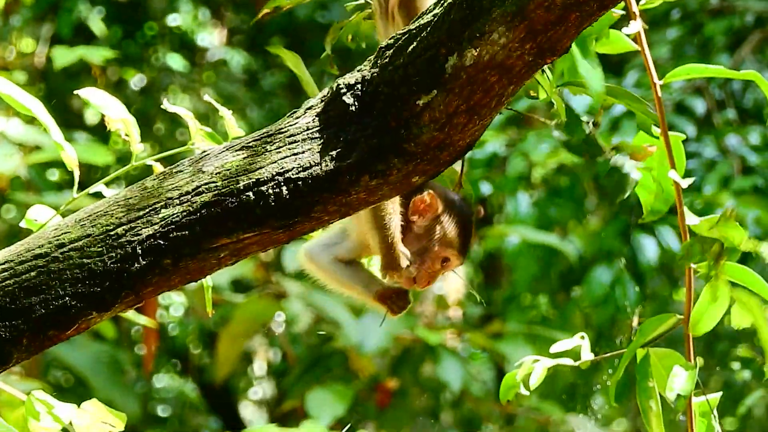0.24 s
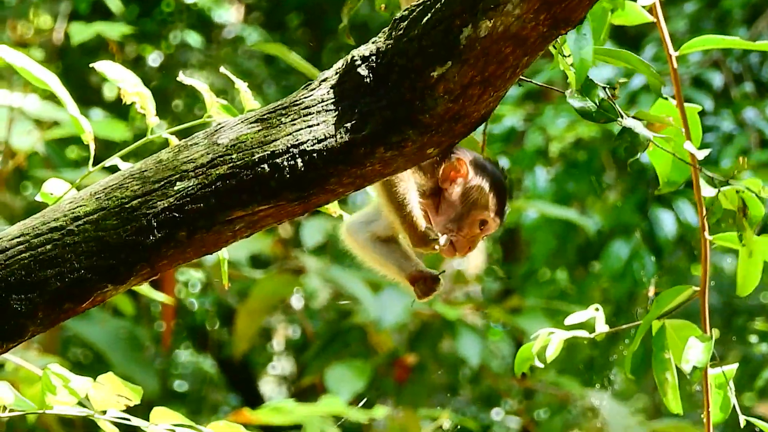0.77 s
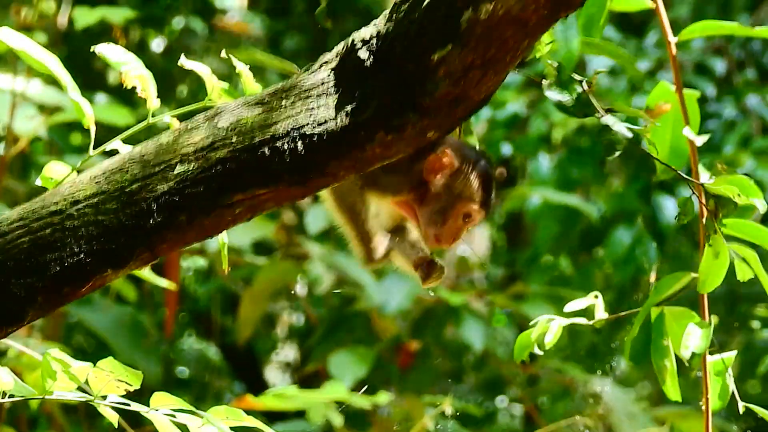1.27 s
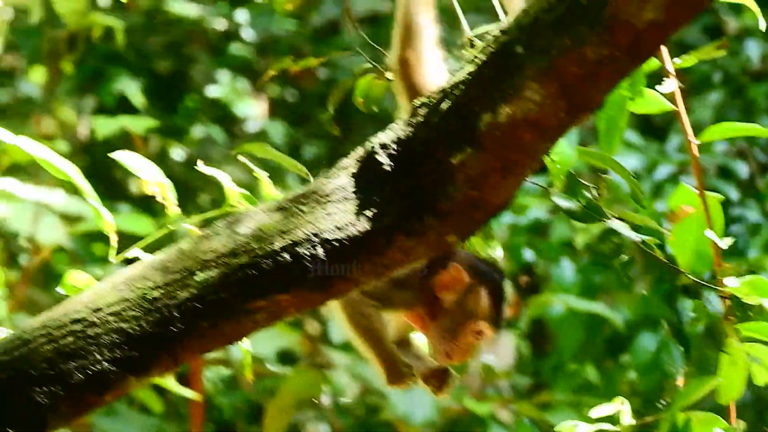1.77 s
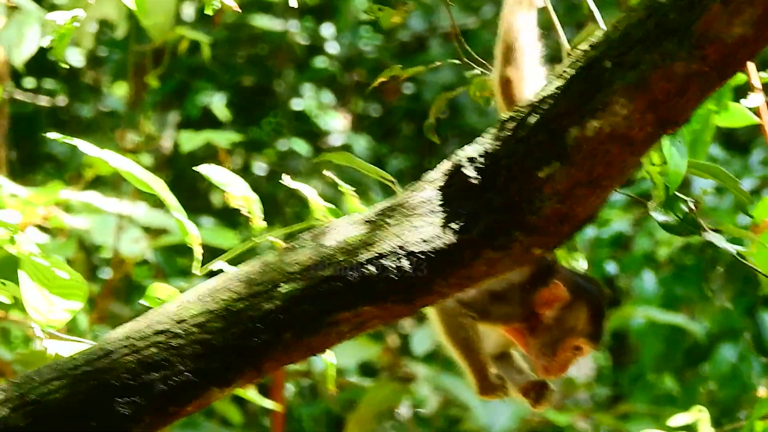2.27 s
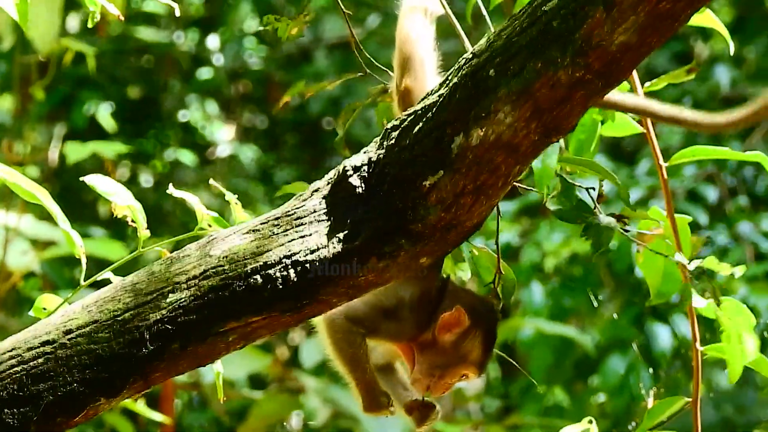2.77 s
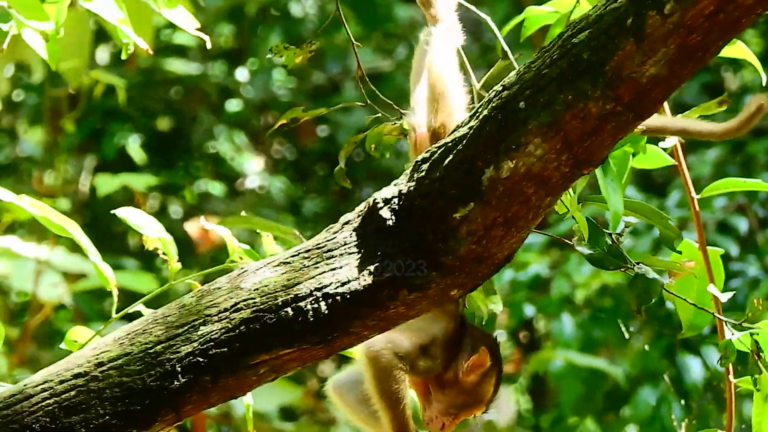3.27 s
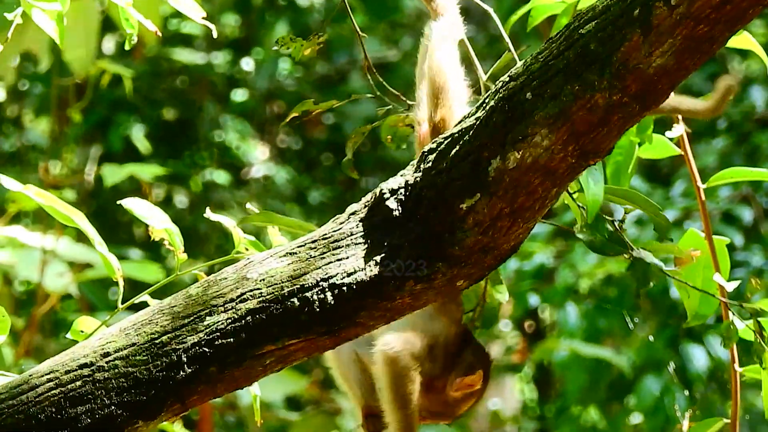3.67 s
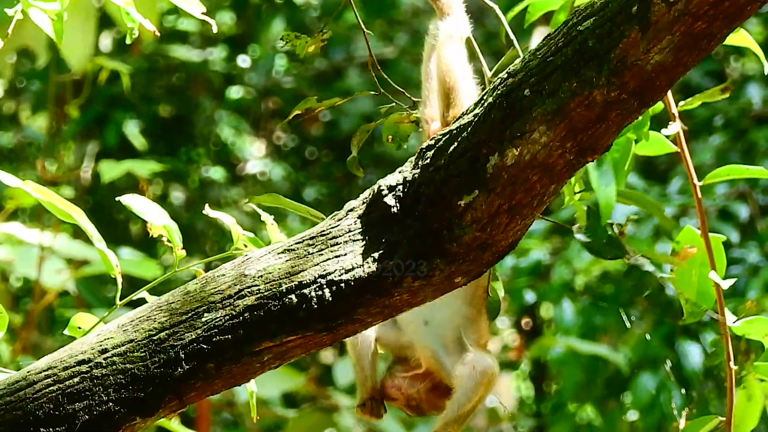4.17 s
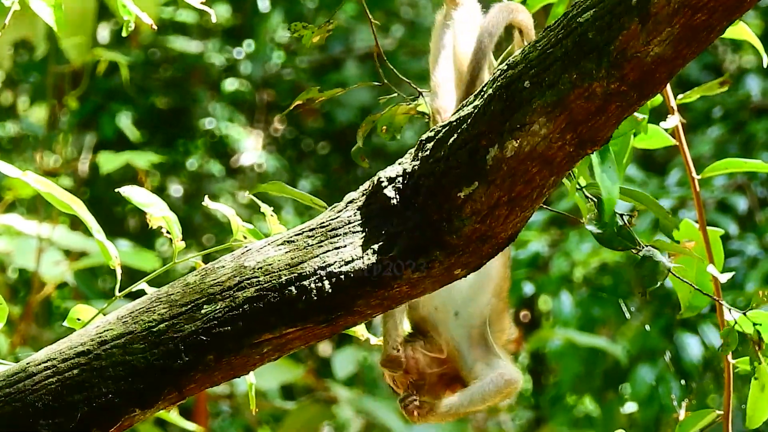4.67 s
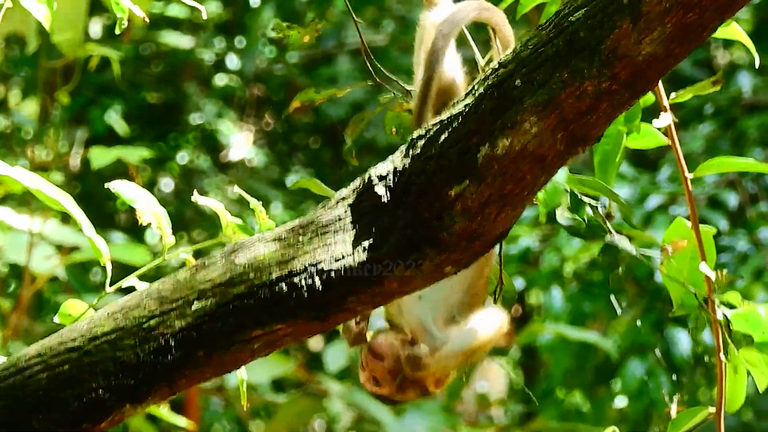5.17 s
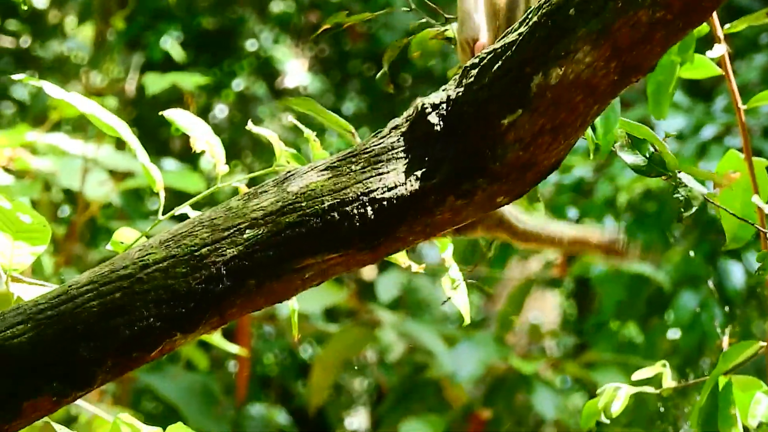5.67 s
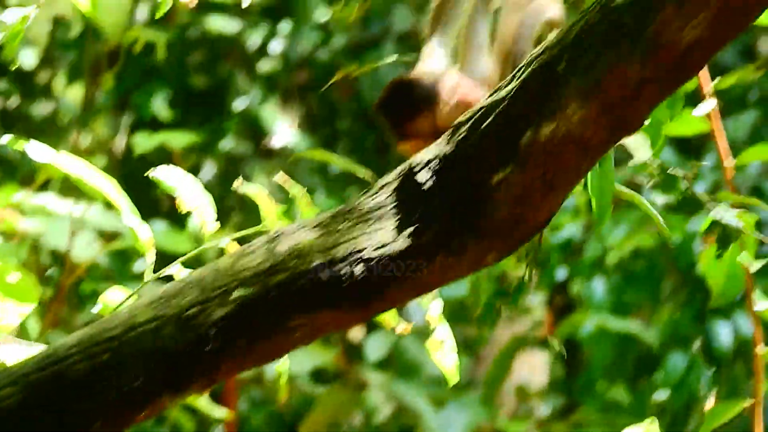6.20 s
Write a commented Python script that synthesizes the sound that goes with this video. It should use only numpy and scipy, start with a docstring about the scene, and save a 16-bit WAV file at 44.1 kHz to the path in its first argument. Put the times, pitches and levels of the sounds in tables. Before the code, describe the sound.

At a forest edge, deep distant traffic rumbles continuously beneath a high insect hiss. One insect rasps evenly about five times a second. Thin, very high bird chirps appear early, then in a quick falling run, with a sharp closer squeak around three seconds and faint gliding whistles farther away. Occasional twigs tick. A wide stereo microphone catches calls scattering among trees.

```python
"""A forest edge with far road traffic rumbling behind it. One insect rasps five times a second, in
flares of filtered noise, over a steady noise chorus; small birds chirp and whistle in trilled or gliding
sines, and one sharp squeak, a sine with its octave, comes from nearer by. Trunks and leaves give the bird
calls, squeak and ticks a scattered noise tail; now and then a twig ticks. Traffic is bands of noise and
one wavering engine drone; a faint moan and a soft sizzle come and go."""
import sys
import numpy as np
from scipy import signal
from scipy.fft import rfft, irfft
from scipy.io import wavfile
from scipy.ndimage import uniform_filter1d

SR = 44100
rng = np.random.default_rng(int(sys.argv[2]) if len(sys.argv) > 2 else 0)


def output_pcm(signal):
    """Save a mono or channel-first signal as 16-bit PCM at the path in sys.argv[1].

    Samples are clipped to [-1, 1] before scaling.
    """
    pcm = np.clip(np.atleast_2d(signal).T, -1, 1) * 32767
    wavfile.write(sys.argv[1], SR, np.round(pcm).astype(np.int16))


N = 284004
TIME = np.arange(N) / SR


def gain_of(db):
    """Decibels to gain."""
    return 10 ** (np.asarray(db) / 20)


def evened(x):
    """Scales to rms 1."""
    return x / np.sqrt(np.mean(x ** 2) + 1e-20)


def read(points, hz):
    """Reads a table of values by frequency on a log-frequency axis."""
    f, value = np.transpose(points)
    return np.interp(np.log(hz + 1), np.log(f + 1), value)


def follow(rows, t=TIME):
    """Reads every column of a curve table at the times t."""
    s, *columns = np.transpose(rows)
    return [np.interp(t, s, c) for c in columns]


def add(mix, s, sound):
    """Mixes a sound in at s seconds."""
    part = mix[round(s * SR):][:len(sound)]
    part += sound[:len(part)]


def wander(rate_hz):
    """Smooth random drift of rms 1: noise with a soft roll-off around rate_hz."""
    hz = np.fft.rfftfreq(N, 1 / SR)
    return evened(irfft(rfft(rng.standard_normal(N)) * np.exp(-(hz / rate_hz) ** 2), N))


# Likeness of the two ports. Each row: frequency in Hz, left-right likeness from 0 to 1.
LIKENESS = [(60, .9955), (200, .994), (380, .975), (700, .95), (1300, .91), (2400, .85), (3500, .72),
            (4700, .6), (6800, .25), (15000, .05)]
# Phase between the ports. Each row: frequency in Hz, lead of the left port in radians.
LEFT_LEAD = [(0, 0), (2500, 0), (4650, -.5), (5800, -.4), (6600, -.9), (7500, 0)]


def air_noise(spectrum, patchy_db, size=1024):
    """Diffuse stereo noise that swells in drifting patches; the two ports agree most in the bass."""
    hz = np.fft.rfftfreq(size, 1 / SR)
    draws = rng.standard_normal((5, N * 4 // size + 5, len(hz)))
    a, b, c, d, patches = draws.transpose(0, 2, 1)
    # smooth over frequency, then over time
    patches = uniform_filter1d(patches, size=7, axis=0)
    patches = evened(uniform_filter1d(patches, size=5, axis=1))
    # the right port shares part of the left and gets the rest of its own
    same = np.clip(read(LIKENESS, hz), -1, 1)[:, None]
    left = a + 1j * b
    right = same * left + np.sqrt(1 - same ** 2) * (c + 1j * d)
    right = right * np.exp(-1j * read(LEFT_LEAD, hz))[:, None]
    z = np.array([left, right]) * gain_of(read(spectrum, hz)[:, None] + patchy_db * patches)
    return evened(signal.istft(z, nperseg=size, noverlap=size - size // 4)[1][:, :N])


def slur(length, hz, glide_hz, bend, trill_hz=0):
    """Phase and envelope of a note gliding through hz, bent by an unsteady throat and a fast trill."""
    t = np.arange(int(length * SR)) / SR
    pitch = (hz + glide_hz * (t / length - .5)) * (1 + bend[:len(t)])
    pitch = pitch + trill_hz * np.sin(2 * np.pi * (135 * t + rng.random()))  # trill at 135 Hz
    # sqrt(2) gives the sine under the envelope an rms of 1
    envelope = np.sqrt(2) * evened(signal.windows.tukey(len(t), .45))
    return 2 * np.pi * np.cumsum(pitch) / SR, envelope


FIRST_STROKE_S, STROKES_PER_S, SLOWING_PER_S2 = .087, 5.138, .0213  # the strokes slow slightly
# Colour of the rasp. Each row: frequency in Hz, relative density in dB.
RASP_COLOUR = [(3000, -42), (3900, -21.5), (4200, -4.5), (4500, 2.5), (4720, 7), (4900, 0.5), (5100, -3),
               (5500, -7), (6300, -46), (10000, -65)]


def rasping_insect():
    """One insect's regular strokes: noise flares up and dies away among the leaves."""
    t = TIME - FIRST_STROKE_S
    strokes = 1 + STROKES_PER_S * t - SLOWING_PER_S2 * t ** 2 / 2
    stroke = strokes.astype(int)
    age = strokes % 1 / STROKES_PER_S  # seconds into the stroke
    flare = (1 - np.exp(-(age / 0.012) ** 2)) * np.exp(-age / 0.078)
    force = gain_of(-33.5 + rng.standard_normal(stroke[-1] + 1) / 2)[stroke]
    # a floor at -41 dB keeps the rasp from going silent between strokes
    return np.hypot(force * flare, gain_of(-41)) * air_noise(RASP_COLOUR, patchy_db=1)


RUN_START_S, RUN_STEP_S, RUN_NOTE_S = 2.251, .113, 0.048
RUN_FIRST_HZ, RUN_LAST_HZ, RUN_SETTLE_S, RUN_TRILL_HZ = 6910, 6570, .125, 30  # sinks towards RUN_LAST_HZ
RUN_DB, RUN_ENDS_DB = -27, -5  # level in the middle, and the change from there to either end


def chirp_run(count):
    """Evenly spaced chirps that sink in pitch while they swell and fade."""
    t = np.arange(count) * RUN_STEP_S
    hz = RUN_LAST_HZ + (RUN_FIRST_HZ - RUN_LAST_HZ) * np.exp(-t / RUN_SETTLE_S)
    db = RUN_DB + RUN_ENDS_DB * np.linspace(-1, 1, count) ** 2
    return [(RUN_START_S + s, RUN_NOTE_S, f, level, RUN_TRILL_HZ) for s, f, level in zip(t, hz, db)]


CHIRP_SAG = .012  # fall of each chirp as a share of its pitch
CHIRP_WET = 0.88  # share of the power that the leaves scatter
# Thin chirps. Each row: start in seconds, length in seconds, pitch in Hz, level in dB before the trees,
# trill depth in Hz.
CHIRP_NOTES = [ (1.2, 0.049, 6190, -27.5, 66), (1.31, 0.03, 6290, -24.5, 83),
               (1.329, 0.051, 6290, -19.5, 110), (2.217, 0.038, 6990, -32.5, 30),
               (3.267, 0.033, 5770, -27.5, 6.2), (4.283, .03, 6120, -37, 5), (5.355, .04, 6260, -32.5, 20),
               (5.408, .041, 6560, -28, 310), (5.473, 0.049, 6715, -26.5, 160),
               (5.555, 0.034, 6570, -31, 150), (5.683, 0.038, 5710, -32, 18)]


def chirps():
    """Sagging sines with a fast trill; returns the direct part and the part sent into the trees."""
    out, unsteady = np.zeros(N), 0.0071 * wander(162)
    for s, length, hz, db, trill_hz in CHIRP_NOTES + chirp_run(count=6):
        angle, swell = slur(length, hz, -CHIRP_SAG * hz, unsteady[round(s * SR):], trill_hz)
        add(out, s, gain_of(db) * swell * np.sin(angle))
    return np.sqrt(1 - CHIRP_WET) * out, np.sqrt(CHIRP_WET) * out


# Syllables of the near squeak. Each row: start in seconds, length in seconds, pitch in Hz, glide in Hz,
# fundamental in dB and octave in dB, both before the trees.
SQUEAK_SYLLABLES = [ (2.95, .048, 3540, -180, -63, -36), (2.996, 0.028, 3400, -12, -56, -24.5),
                    (3.029, 0.035, 3983, 30, -29.5, -30), (3.054, 0.034, 4115, 30, -28.5, -37.5),
                    (3.082, 0.031, 3630, -20, -51, -32)]


def squeak():
    """A thin falling squeak, heard as its octave, that jumps up in pitch and sounds full for a moment."""
    out, unsteady = np.zeros(N), 0.007 * wander(277)
    for s, length, hz, glide_hz, first_db, octave_db in SQUEAK_SYLLABLES:
        angle, swell = slur(length, hz, glide_hz, unsteady[round(s * SR):])
        fundamental = gain_of(first_db) * np.sin(angle)
        octave = gain_of(octave_db) * np.sin(2 * angle)
        add(out, s, swell * (fundamental + octave))
    return out


# Slurred notes of a farther bird. Each row: start in seconds, length in seconds, pitch in Hz, glide in Hz,
# level in dB before the trees, rms quaver as a share of pitch.
WHISTLE_NOTES = [ (1.595, 0.13, 3217, 130, -40, 0.012), (1.797, .02, 3565, -150, -39, .02),
                 (1.81, 0.046, 3240, -15, -35.5, 0.0087), (1.95, 0.037, 3314, -13, -37.5, 0.0066),
                 (2.44, 0.075, 2987, 160, -36.5, .015), (2.65, .07, 3180, 120, -38, .02),
                 (2.73, 0.12, 2813, -600, -38.5, .026), (5.74, 0.0848, 3364, 340, -36, .016),
                 (5.915, .125, 3290, -260, -41, .02), (6.06, 0.052, 2884, -300, -36, 0.032),
                 (6.15, 0.036, 2590, -50, -43, .02)]


def whistles():
    """A farther bird whistles slurred notes: gliding sines with a slight random quaver."""
    out, unsteady = np.zeros(N), wander(112)
    for s, length, hz, glide_hz, db, quaver in WHISTLE_NOTES:
        angle, swell = slur(length, hz, glide_hz, quaver * unsteady[round(s * SR):])
        add(out, s, gain_of(db) * swell * np.sin(angle))
    return out


# Twig ticks. Each row: start in seconds, onset level in dB before the trees, centre in Hz.
TWIG_TICKS = [(1.803, -38, 4500), (2.088, -38, 6800), (3.113, -31, 6300), (6.21, -39, 5000)]


def twigs():
    """Dry ticks: short, fast-dying bursts of noise in one broad resonance."""
    out, t = np.zeros(N), np.arange(SR // 20) / SR
    for s, db, hz in TWIG_TICKS:
        wood = signal.lfilter(*signal.iirpeak(hz, 3.5, fs=SR), rng.standard_normal(len(t)))
        wood = signal.sosfilt(signal.butter(4, 8000, fs=SR, output="sos"), wood)
        add(out, s, gain_of(db) * evened(wood) * np.exp(-t / 0.019))
    return out


# Ring of the trees. Each row: frequency in Hz, time to fall by 60 dB in seconds.
FOREST_DECAY = [(2500, 1.1), (4000, 1.74), (6300, 1.38), (8000, 1.14), (12000, 0.82)]


def forest(direct, scattered, lag, pan_db, one_side, all_round):
    """Trunks and leaves add a dense noise tail, part from the caller's side; left leads by lag samples."""
    hz, t, z = signal.stft(rng.standard_normal((3, SR)), SR, nperseg=256)
    near_leaves = 1 + 0.45 * np.exp(-t / 0.014)  # stronger early scatter
    decay = gain_of(-60 * t / read(FOREST_DECAY, hz)[:, None])
    tail = signal.istft(z * near_leaves * decay, SR, nperseg=256)[1]
    echoes = signal.fftconvolve(scattered[None], tail / np.linalg.norm(tail[0]), axes=1)[:, :N]
    sides = np.array([[1], [-1]]) / 2  # left, right
    steering = gain_of(sides * pan_db) * np.exp(2j * np.pi * np.fft.rfftfreq(N) * sides * lag)
    steered = irfft(rfft(direct + one_side * echoes[0]) * steering, N)
    return steered + all_round * echoes[1:]


# Level of the insect chorus. Each row: time in seconds, level in dB.
CHORUS_LEVEL = [(0, -36), (.5, -42.5), (3.6, -38.5), (5.2, -39.5), (6.44, -37.5)]
# Colour of the chorus. Each row: frequency in Hz, relative density in dB.
CHORUS_COLOUR = [(2500, -34), (3800, -12.5), (4400, 0), (5200, -0.5), (5700, -0.5), (6300, 1.5), (6800, -1),
                 (7400, -7), (8000, -13.5), (9000, -21), (10000, -27.5), (12000, -42), (15500, -70)]


def insect_chorus():
    """Many insects blur into a hiss of noise with a slight flutter in level."""
    level_db = follow(CHORUS_LEVEL)[0] + 0.44 * wander(25)
    return gain_of(level_db) * air_noise(CHORUS_COLOUR, patchy_db=1.6)


# Level of the sizzle. Each row: time in seconds, level in dB.
SIZZLE_LEVEL = [(0, -50), (1.2, -63), (4.4, -52), (4.8, -47), (6.44, -47.5)]
# Colour of the sizzle. Each row: frequency in Hz, relative density in dB.
SIZZLE_COLOUR = [(1000, -70), (2000, -32), (2600, -6), (3100, 0.5), (3700, 2), (4100, 3.5), (5000, -33),
                 (9000, -70)]


def sizzle():
    """A soft distant sizzle of band noise that sinks at first and swells later on."""
    return gain_of(follow(SIZZLE_LEVEL)[0]) * air_noise(SIZZLE_COLOUR, patchy_db=2.5)


# Levels of the road. Each row: time in seconds, deep rumble in dB, boom in dB, tyre noise in dB.
ROAD_LEVELS = [(0, -28, -31, -40), (1.3, -30.5, -31.5, -39.3), (2.2, -30.5, -29.5, -40),
               (3.4, -31.5, -28.7, -39.5), (4.8, -31, -28.5, -38.5), (5.5, -31, -29, -38.5),
               (6.44, -31, -27, -37.5)]
# Colours of rumble, boom, tyres and a nearing vehicle. Each row: frequency in Hz, relative density in dB.
RUMBLE_COLOUR = [(15, -55), (25, -36), (32, -29), (42, -15.5), (60, -4.5), (80, -1), (100, 1.5), (125, -7),
                 (200, -22.5), (500, -66)]
BOOM_COLOUR = [(40, -46), (80, -15.5), (105, -1), (140, 1), (170, -4), (195, -7), (230, -11.5),
               (265, -15.5), (320, -20), (380, -32), (900, -64)]
TYRE_COLOUR = [(120, -32), (250, 0.5), (360, 0.5), (440, 1.5), (490, -2.5), (610, 0.5), (730, -2),
               (880, -4), (1050, -5), (1850, -6.5), (2150, -2.5), (2500, -9), (3600, -12.5), (7000, -22.5),
               (11000, -35), (15000, -48)]
NEARING_COLOUR = [(150, -22), (205, 0), (265, -0.5), (340, -7.5), (450, -13), (700, -40), (2000, -100)]
NEARING_END_DB, NEARING_DB_PER_S = -42.5, 5


def traffic():
    """Far traffic as bands of noise: deep rumble, boom, tyres, and a nearing vehicle that grows louder."""
    rumble_db, boom_db, tyres_db = follow(ROAD_LEVELS)
    rumble = gain_of(rumble_db) * air_noise(RUMBLE_COLOUR, patchy_db=.6, size=8192)
    boom = gain_of(boom_db) * air_noise(BOOM_COLOUR, patchy_db=1.37, size=4096)
    tyres = gain_of(tyres_db) * air_noise(TYRE_COLOUR, patchy_db=3.0, size=4096)
    nearing_db = NEARING_END_DB - NEARING_DB_PER_S * (TIME[-1] - TIME)
    nearing = gain_of(nearing_db) * air_noise(NEARING_COLOUR, patchy_db=1.5, size=4096)
    return rumble + boom + tyres + nearing


# One far engine, before its wavering. Each row: time in seconds, pitch in Hz, fundamental in dB, octave in dB.
ENGINE_CURVE = [(0, 173, -52, -55.5), (1.2, 174, -41, -54), (3.2, 160, -32.5, -60), (5.4, 155, -33.5, -50),
                (5.9, 165, -34.5, -45.5), (6.44, 163.4, -39, -45)]


def engine_drone():
    """One far engine: a sine and its octave, both wavering in pitch and level."""
    hz, first_db, octave_db = follow(ENGINE_CURVE)
    angle = 2 * np.pi * np.cumsum(hz * (1 + 0.00968 * wander(7))) / SR
    fundamental = gain_of(first_db) * np.sin(angle)
    octave = gain_of(octave_db) * np.sin(2 * angle)
    return np.sqrt(2) * (fundamental + octave) * gain_of(2 * wander(11))


MOAN_SWELL_S, MOAN_REST_DB = 0.21, -50.5  # width of a swell, and the floor between swells
# Swells of the moan. Each row: peak time in seconds, level in dB, added in power to the floor.
MOAN_SWELLS = [(.08, -44.5), (1.25, -48), (3.7, -48.5), (4.8, -46), (6.3, -49.5)]
# Colour of the moan. Each row: frequency in Hz, relative density in dB.
MOAN_COLOUR = [(600, -50), (735, -13), (765, 1), (795, 2), (840, -1), (880, -7), (1100, -69)]


def moan():
    """A faint far moan: narrow-band noise that comes and goes in smooth swells."""
    swells = sum(gain_of(db) * np.exp(-((TIME - s) / MOAN_SWELL_S) ** 2) for s, db in MOAN_SWELLS)
    level = np.hypot(swells, gain_of(MOAN_REST_DB))
    return level * air_noise(MOAN_COLOUR, patchy_db=5.0, size=4096)


def scene():
    """Birds lean right; squeak and twigs reach the left first; insects and traffic lie all round."""
    song, near = whistles(), squeak() + twigs()
    chirping = forest(*chirps(), lag=-2.05, pan_db=-2.5, one_side=0.57, all_round=0.61)
    # the farther bird is heard mostly through its scattered tail
    whistling = forest(song / 10, song, lag=0.074, pan_db=-2.5, one_side=0.72, all_round=0.44)
    squeaking = forest(0.78 * near, 0.93 * near, lag=1.68, pan_db=-0.5, one_side=0.67, all_round=.45)
    calls = chirping + whistling + squeaking
    insects = rasping_insect() + insect_chorus() + sizzle()
    return calls + insects + traffic() + engine_drone() + moan()


EDGE_HZ = 15700  # upper band limit


def record(dry):
    """The right port is a little more sensitive; then the band limit."""
    ports = dry * gain_of([[-.28], [.28]])
    lowpass = signal.firwin(511, EDGE_HZ, window=("kaiser", 9), fs=SR)
    return signal.oaconvolve(ports, lowpass[None], "same")


dry = scene()
out = record(dry)
output_pcm(out)
```